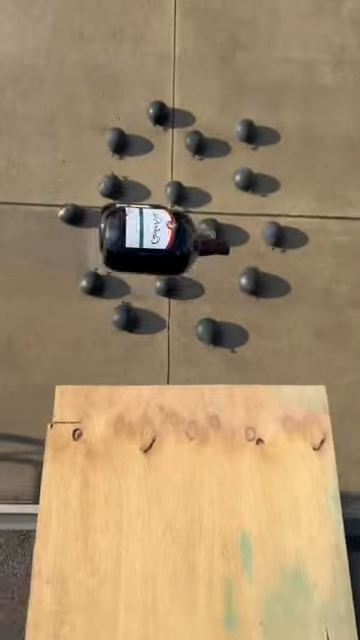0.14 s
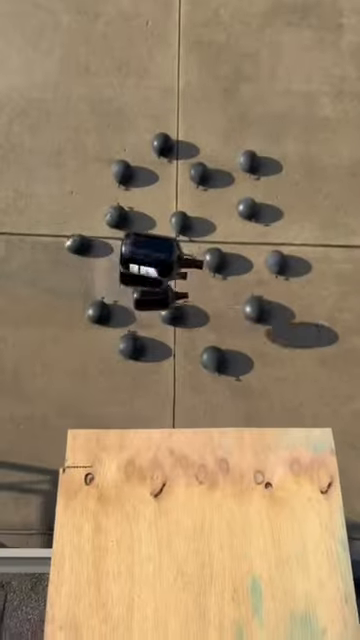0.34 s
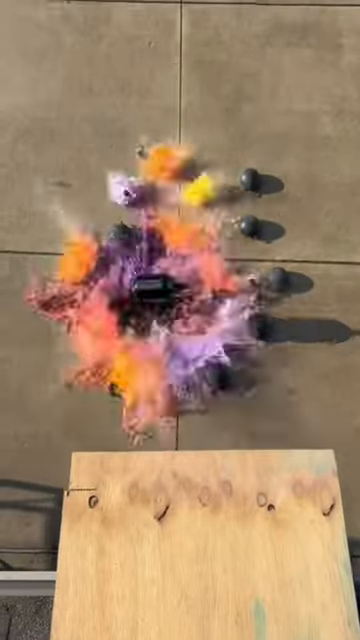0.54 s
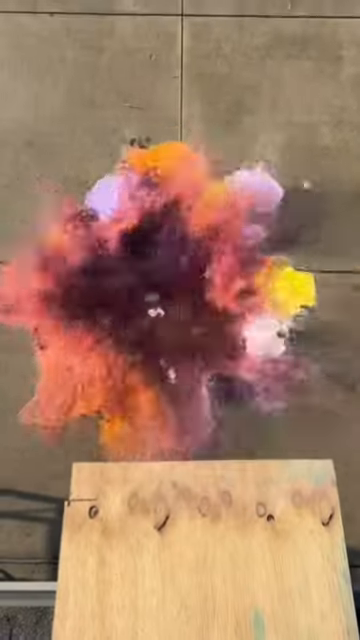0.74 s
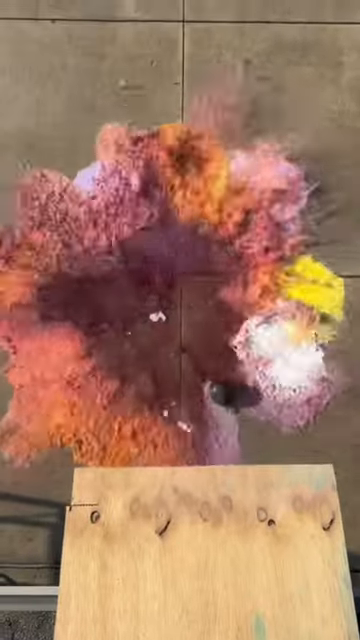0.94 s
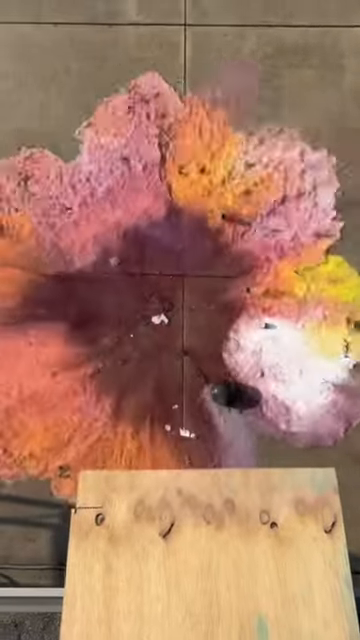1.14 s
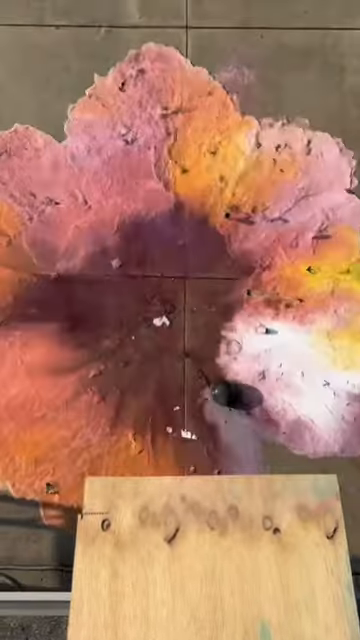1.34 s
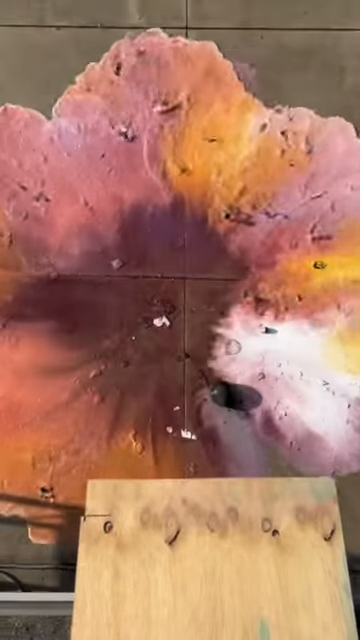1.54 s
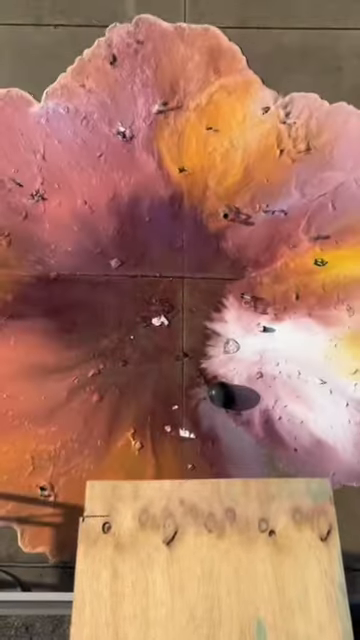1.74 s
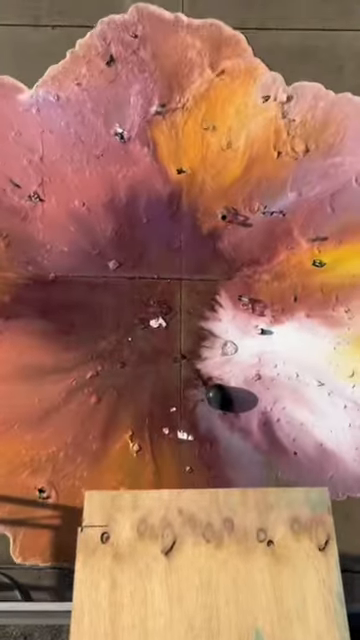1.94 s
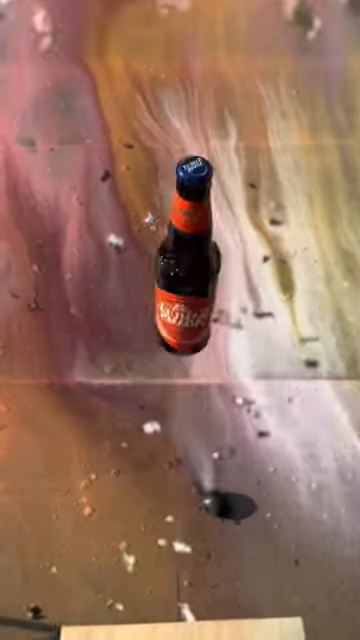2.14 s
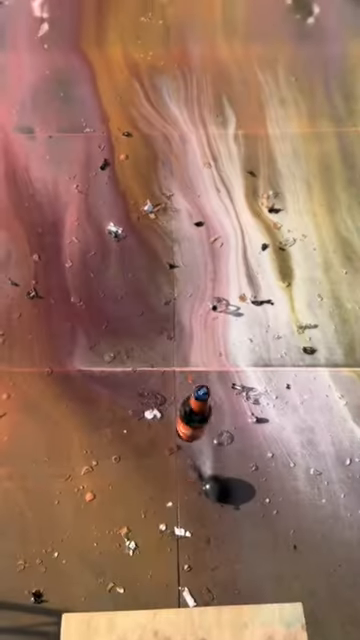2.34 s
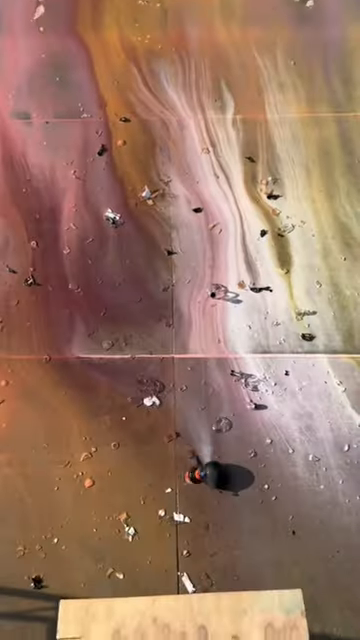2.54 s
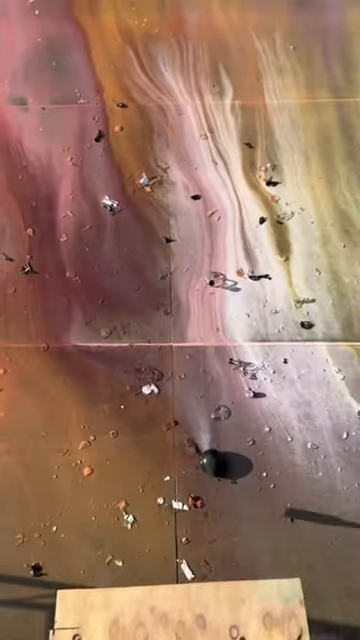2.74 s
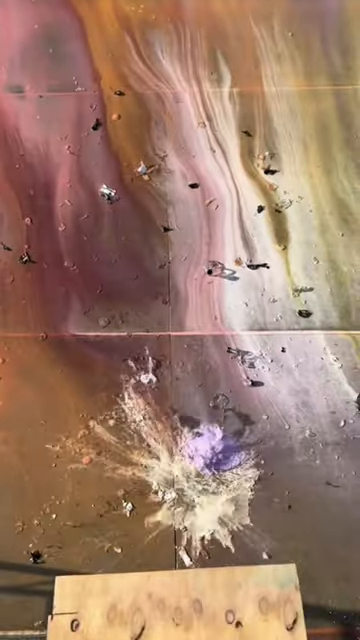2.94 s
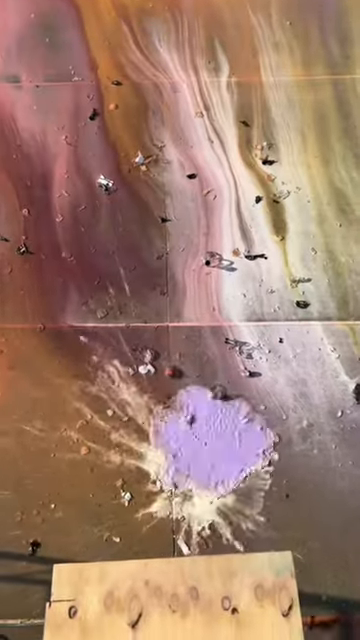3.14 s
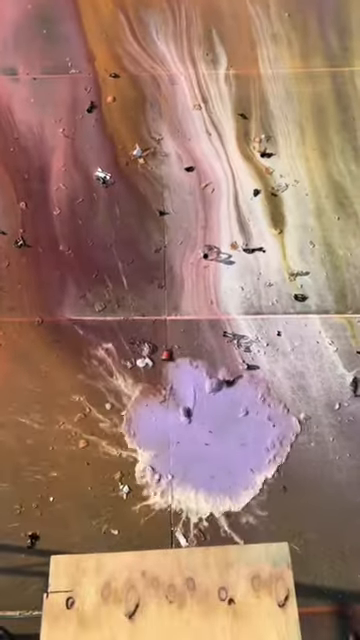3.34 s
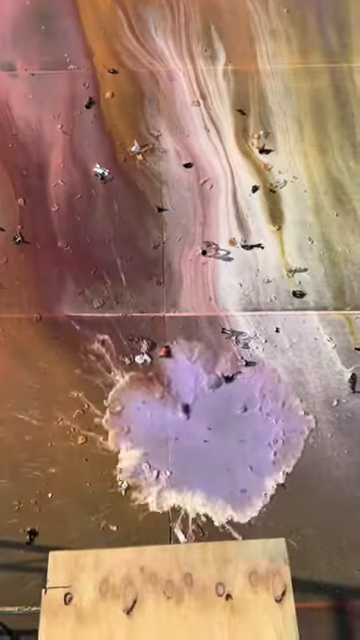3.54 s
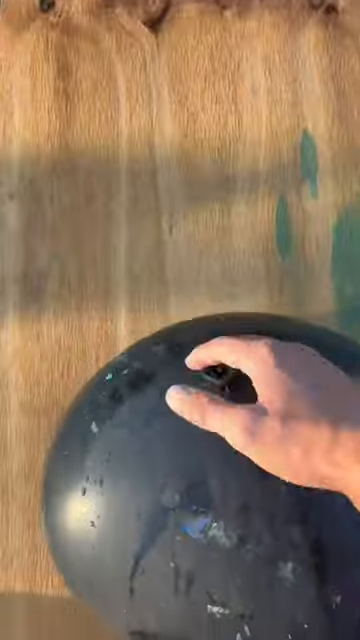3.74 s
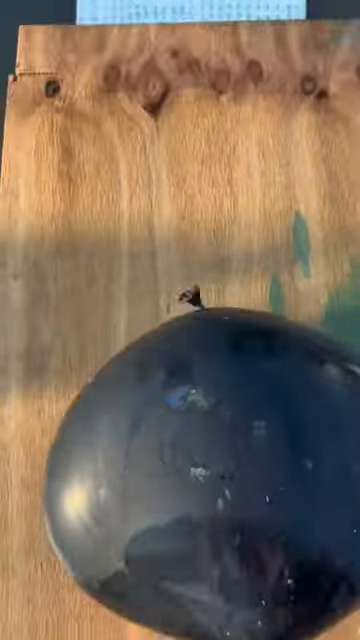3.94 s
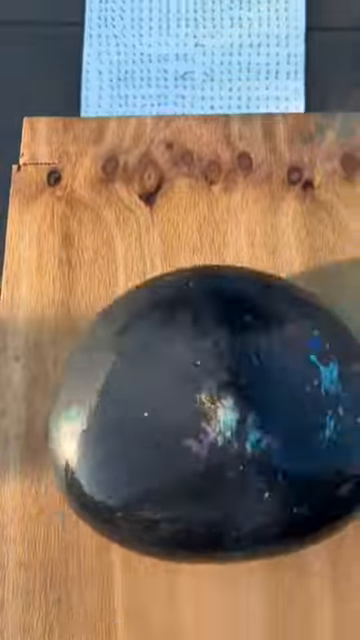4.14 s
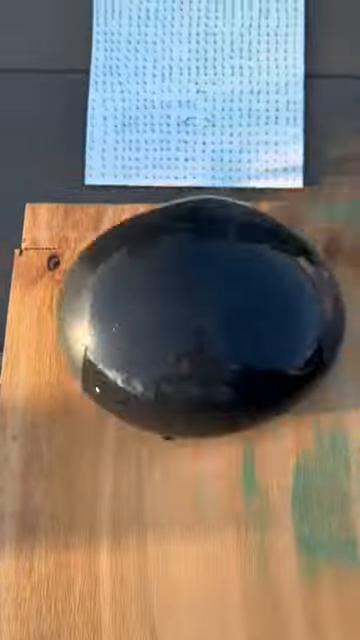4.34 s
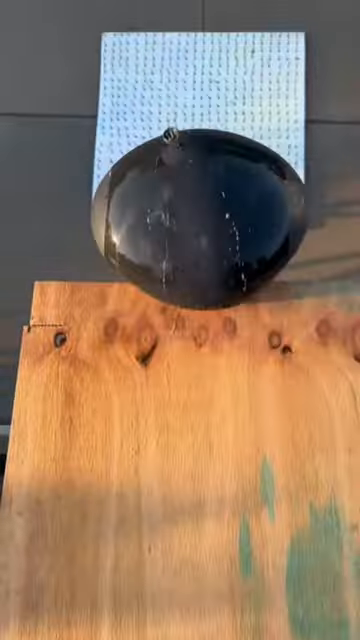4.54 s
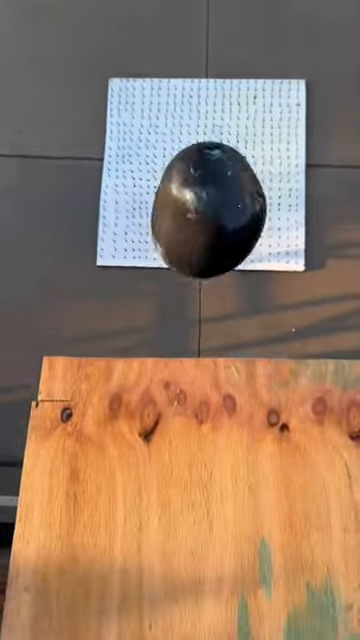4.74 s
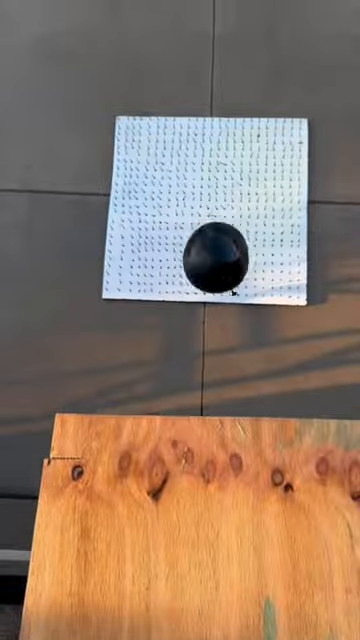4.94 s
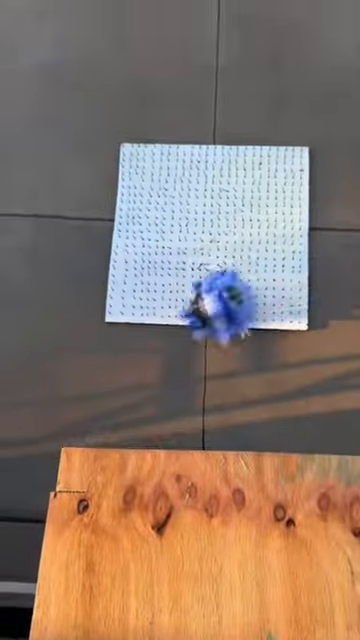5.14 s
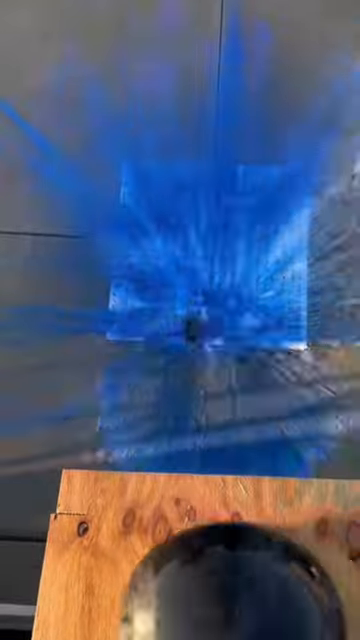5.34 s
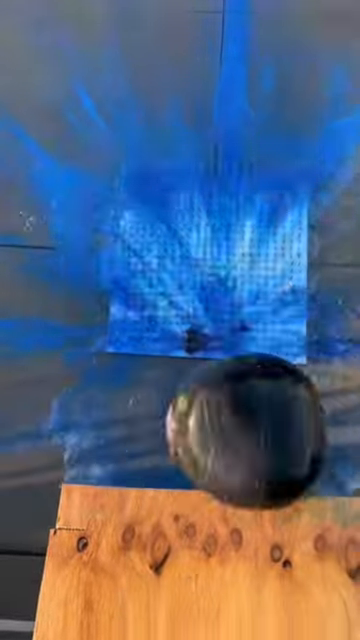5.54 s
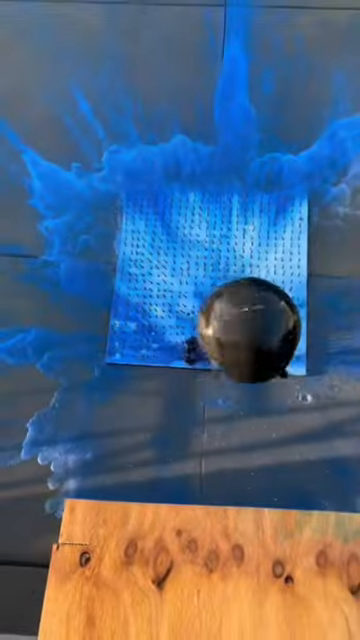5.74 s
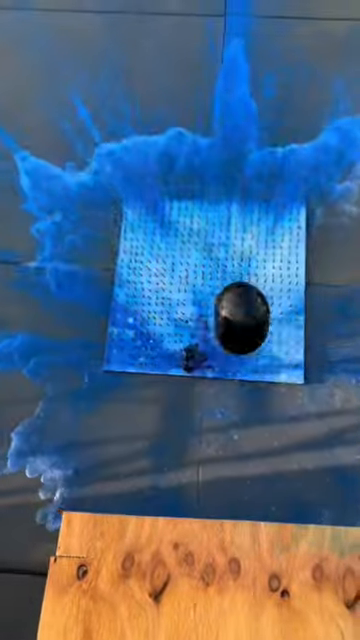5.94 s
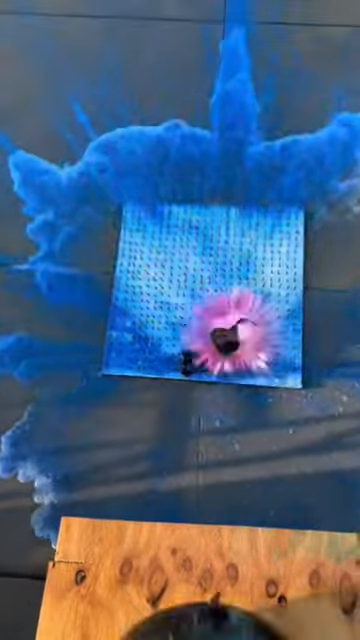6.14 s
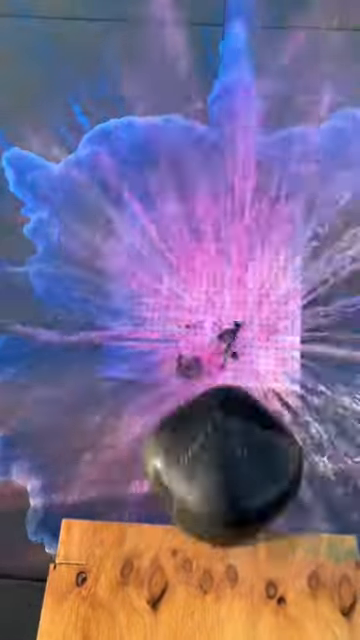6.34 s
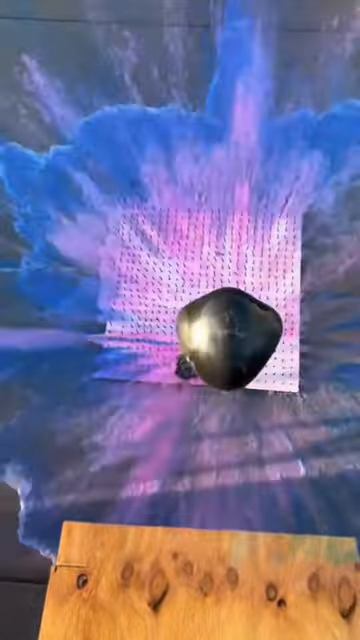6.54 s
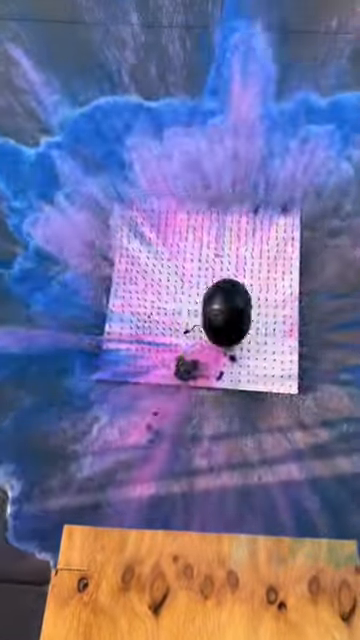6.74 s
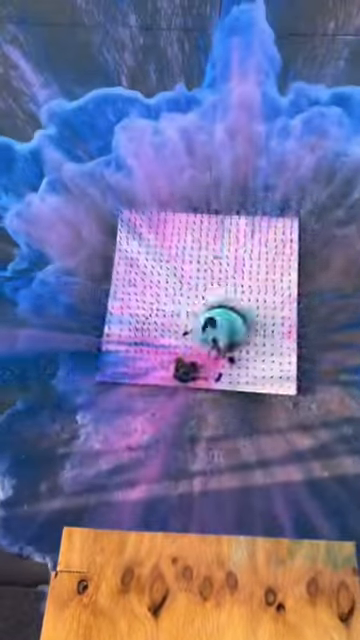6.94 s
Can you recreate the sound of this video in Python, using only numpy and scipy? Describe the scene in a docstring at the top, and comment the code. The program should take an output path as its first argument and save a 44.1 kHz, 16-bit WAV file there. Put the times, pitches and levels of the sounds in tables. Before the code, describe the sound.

Outdoors, wind buffets the microphone as two heavy glass jugs smash on concrete among paint balloons. Sharp cracks, jangling shards and wet hissing splatter thin out into crackle. A smaller bottle shatters with dull knocks, and a thick piece bounces with bright clinks. After a very brief dip, soft rubber scuffs on wood lead to three loud water-balloon bursts, each a snap, a low wet slap and fine spray.

```python
"""Concrete slab below a high wooden platform: two glass jugs smash among paint balloons, a small bottle follows
and a piece of it bounces, then three water balloons burst on a nail bed and their spray rains back.
Glass is noise bursts and dying sines; liquid is tilted hiss plus falling low waves; bursts are snapped noise.
Wind (lumpy low noise) and buffets hit the microphone over a wavering engine note and far traffic noise.
Three scenes; the sound drops briefly between the last two."""
import sys
import numpy as np
from scipy import signal
from scipy.fft import rfft, irfft
from scipy.io import wavfile
from scipy.ndimage import uniform_filter1d

SR = 44100
rng = np.random.default_rng(int(sys.argv[2]) if len(sys.argv) > 2 else 0)


def output_pcm(signal):
    """Save a mono or channel-first signal as 16-bit PCM at the path in sys.argv[1].

    Samples are clipped to [-1, 1] before scaling.
    """
    pcm = np.clip(np.atleast_2d(signal).T, -1, 1) * 32767
    wavfile.write(sys.argv[1], SR, np.round(pcm).astype(np.int16))


N = 307818

# scenes: (start [s], end [s], traffic level [dB], engine relative level [dB], fade towards the end [dB])
SCENES = [(0, 1.773, -44, -58, -7), (1.98, 3.613, -44, -47, 0.5), (3.626, 6.98, -40.5, -44.5, -1)]
FADE_S, CUT_S = 0.36, 0.0021
GAP_DB = -19  # far sounds in the gap before the third scene
# wind, one curve a spell: (time [s], relative level [dB])
WIND_SPELLS = [
    [(0, -22), (.1, -19.5), (.18, -27.5), (.21, -18), (.27, -21.5), (.31, -26.5), (.36, -22), (.39, -26.5),
     (.42, -25.5), (.7, -32.5), (.85, -36), (1.12, -34.5), (1.22, -29), (1.4, -29), (1.47, -32.5),
     (1.7, -38.5), (1.98, -46.5)],
    [(3.63, -38.5), (4.0, -41), (4.7, -47.5), (6.0, -56.5), (6.35, -50), (6.8, -51), (6.98, -38)],
]
# wind spectrum: (frequency [Hz], relative density [dB per Hz])
WIND_COLOUR = [(21, -34.5), (35, -14), (59, 8), (137, -6), (405, -21.5), (693, -48.5), (1040, -77.5),
               (1760, -120)]
# wind at the two ports: (frequency [Hz], left-right likeness [0-1])
WIND_LIKENESS = [(60, 0.99), (180, 0.86), (550, 0.62)]
# air shoved at the microphone by each water balloon, added to the wind
PUSH_RELATIVE_DB, PUSH_RISE_S, PUSH_FADE_DB_PER_S = -37.5, 0.0083, 72.5
# sudden slaps of wind: (time [s], peak [dB])
BUFFETS = [(0.079, -28), (0.2, -22), (0.263, -25)]
BUFFET_S = .0006
# spectrum of the traffic noise; a narrow dip near 6 kHz runs through the whole sound: (frequency [Hz], relative
# density [dB per Hz])
TRAFFIC_COLOUR = [(47, -36.5), (80, -11), (141, -1), (526, -19), (1000, -18), (1650, -22.5), (2400, -34.5),
                  (5240, -41), (5980, -61), (6670, -45), (15000, -56.5)]
# other noise: (frequency [Hz], left-right likeness [0-1])
LIKENESS = [(60, 1), (180, 0.99), (550, 0.71), (1650, 0.97), (4970, 0.44), (15000, 0.084)]
# glass cracking and striking the slab: (time [s], peak [dB], length [s], centre [Hz])
CRACKS = [(0.428, -25, 0.043, 3000), (0.443, 1.5, 0.0069, 3500), (0.489, -16, 0.023, 2430),
          (0.543, -0.5, 0.017, 3020), (0.647, -1.5, 0.025, 2180), (0.66, -7, 0.006, 3280),
          (0.696, -1, 0.0032, 2370), (.72, -13, 0.014, 2500), (.793, -12.5, .025, 1110),
          (0.736, -8, 0.012, 1000), (0.763, -1, 0.0044, 1350), (0.831, -8, 0.0044, 1500),
          (0.856, -11.5, 0.0043, 1800), (0.881, -7, 0.003, 2360), (1.034, -15, 0.034, 1210),
          (1.051, -14, 0.022, 2450), (1.098, -3, 0.01, 5360), (1.165, -16, 0.019, 2080),
          (2.694, -6, 0.0048, 1750), (2.721, -11, 0.0094, 2520), (2.924, -7.5, 0.0022, 2640),
          (3.005, -9.5, 0.0061, 2300), (3.044, -20, 0.0084, 5030), (3.059, -21, 0.0065, 3000),
          (3.125, -20, 0.018, 2760), (3.49, -16, 0.0038, 2710)]
# ringing shards: (time [s], relative level [dB], frequency [Hz])
SHARDS = [(0.507, -7, 4790), (.935, -17, 5020), (0.675, -2.5, 3090), (0.696, -9, 760), (0.743, -3.5, 2344),
          (0.792, -8, 2373), (0.829, -8.5, 960), (0.859, -9, 5190), (0.879, -5.5, 3090), (0.927, -14, 3340),
          (0.964, -15.5, 743), (1.002, -15, 3930), (1.05, -7, 5070), (1.073, -9, 3180), (1.099, -4.5, 2183),
          (1.121, -9.5, 1375), (1.166, -11.5, 2145), (1.188, -15, 5090), (1.21, -13.5, 3290),
          (1.263, -16.5, 3320), (1.292, -20, 1090), (3.124, -10.5, 2620), (3.131, -24.5, 3770),
          (3.579, -24, 4160), (.632, -11, 3600), (.662, -9, 3300), (.832, -10, 2540), (.857, -9.5, 2735),
          (1.595, -29, 5780)]
# thick bottle piece landing: (time [s], relative ring level [dB], tick peak [dB])
BOUNCES = [(2.7995, -33.5, -15.5), (2.8384, -39, -16.5), (2.9028, -35.5, -21), (3.055, -40.5, -20),
           (3.221, -55, -28), (3.2478, -40, -23), (3.292, -34, -33), (3.3308, -35.5, -50),
           (3.3636, -37, -48), (3.3861, -25.5, -33), (3.4197, -39, -48), (3.491, -30.5, -28),
           (3.5694, -42, -32)]
# modes of that piece: (frequency [Hz], relative level [dB], t60 [s])
PIECE_MODES = [(4860, -1.5, 0.15), (5050, 3.5, 0.18), (5070, 7.5, 0.042), (5360, -5, 0.017),
               (7000, -11, 0.056), (14300, -14, 0.045), (14900, -7, .03)]
# smashes of the jugs and of the small bottle: (first [s], second [s])
SMASH_S = (.442, 2.692)
CRUMB_COUNTS, CRUMB_THIN_S = (1800, 400), .5  # one count a smash; time constant of thinning
CRUMB_OVER_SPRAY_DB, CRUMB_LOWEST_HZ = 15, 650  # biggest crumb
TINKLES_PER_SMASH, TINKLE_OVER_SPRAY_DB, TINKLE_HZ, TINKLE_T60_S = 260, 11, (6500, 15000), .02
# liquid and crumbs thrown out: (time [s], relative level [dB], fade [dB/s], brightness [dB/octave])
SPLASHES = [(0.443, -30, 46, 0.5), (0.544, -31, 118.5, 0.5), (0.647, -29, 89, -0.5), (1.03, -32, 60, 1.5),
            (2.69, -35.5, 94.5, 0), (5.07, -24.5, 79, 0), (6.07, -26, 109, -1.05), (6.873, -21, 138, -1)]
# spectrum of the splash and burst noise; a narrow dip near 6 kHz runs through the whole sound: (frequency [Hz],
# relative density [dB per Hz])
SPLASH_COLOUR = [(110, -15), (230, 0.5), (1250, -7), (4980, -6.5), (5730, -10.5), (6040, -28.5), (6590, -9),
                 (9030, -8.5), (10400, -14), (12600, -11), (15500, -23), (16400, -85.5)]
SPLASH_RISE_S, SPLASH_DULL_S, SPLASH_DULL_DB_PER_OCTAVE = 0.021, 0.0092, -5.5
# liquid raining back: (peak time [s], relative level [dB], swell [dB/s], fade [dB/s], brightness [dB/octave])
RAINS = [(.85, -35.5, 40.5, 11, 1), (2.81, -40.5, 67, 20, 3.5), (5.378, -38, 41, 43.5, -0.5),
         (6.28, -37.5, 52, 60.5, 2.5), (6.322, -31.5, 403.5, 55.5, -2)]
TRICKLE_S, TRICKLE_RELATIVE_DB = 5.1, -59  # run-off after the first water balloon
# liquid slapping the slab: (time [s], relative level [dB], final frequency [Hz], t60 [s])
SLAPS = [(0.46, -12, 157, 0.068), (.556, -9.5, 143, 0.044), (0.656, -13, 165, 0.083),
         (5.075, -4.5, 263, 0.085), (6.071, -1, 215, 0.043), (6.876, -4.5, 243, 0.059)]
# narrow noise patches, mostly high: (time [s], peak [dB], centre [Hz])
FIZZES = [(1.274, -25, 11000), (1.444, -27, 9530), (1.505, -25, 13200), (1.574, -29, 9000),
          (1.788, -31.5, 12700), (3.433, -35, 9100), (3.602, -22, 9800), (1.325, -29, 700),
          (1.41, -28.5, 790), (1.685, -39, 530)]
# body of the small bottle on the slab: (time [s], relative level [dB])
THUMPS = [(2.696, -23.5), (2.707, -20.5), (2.73, -16.5), (2.754, -28.5), (2.785, -29)]
# modes of that body: (frequency [Hz], relative level [dB], t60 [s])
BODY_MODES = [(330, 2, 0.029), (813, -5.5, 0.039)]
# balloon dragged over plywood: (time [s], peak [dB], length [s], centre [Hz])
SCUFFS = [(3.691, -42.5, 0.032, 4260), (3.902, -43.5, 0.03, 3920), (4.261, -43, 0.15, 3260),
          (4.482, -36, 0.015, 2130), (5.932, -38, 0.16, 7000), (5.949, -28, 0.0036, 5100)]
# water balloons tearing: (time [s], peak [dB], length [s], centre [Hz])
POPS = [(5.075, -5.5, 0.018, 1910), (6.073, -2, 0.0084, 1800), (6.877, -2, 0.013, 1430)]
# wall echoes: (delay [s], level [dB])
WALLS = [(.018, -13.5)]
# yard tail: (frequency [Hz], t60 [s])
YARD_T60 = [(200, 0.11), (1000, .2), (4000, 0.13), (12000, 0.06)]
LOW_CUT_HZ, HIGH_CUT_HZ = 46, 16450


def gain_of(db):
    """Decibels to amplitude ratio."""
    return 10 ** (np.asarray(db) / 20)


def evened(x):
    """Scale to rms 1."""
    return x / np.sqrt(np.mean(x ** 2) + 1e-20)


def read(points, hz):
    """Interpolate a table over log frequency."""
    f, value = np.transpose(points)
    return np.interp(np.log(hz + 1), np.log(f + 1), value)


def add(mix, s, sound):
    """Add a sound in place at s seconds."""
    part = mix[round(s * SR):][:len(sound)]
    part += sound[:len(part)]


def played(curves, t):
    """Summed gain of level curves, silent outside their spans."""
    return sum(gain_of(np.interp(t, *np.transpose(rows)[:2], left=-200, right=-200)) for rows in curves)


def playing(t):
    """Scene index, and a gain that changes towards each scene's end and shuts in the gap before the third."""
    start, end, *_, fade_db = np.transpose(SCENES)
    k = np.searchsorted(start, t, "right") - 1
    gap = np.clip(np.maximum(end[1] - t, t - start[2]) / CUT_S, 0, 1)
    fade = np.clip(1 - (end[k] - t) / FADE_S, 0, 1)
    return k, gap * gain_of(fade_db[k] * fade)


def backdrop(column):
    """Gain of a far sound: one level per scene, shaped by the scene gain."""
    k, gate = playing(np.arange(N) / SR)
    return np.maximum(gate, gain_of(GAP_DB)) * gain_of(np.array(SCENES)[k, column])


def swelling(t, s, db, rise_s, fade_db_per_s):
    """Power of an event: quick rise, even dB fade, confined to its scene."""
    age = np.maximum(t - s, 0)
    fade = gain_of(db - fade_db_per_s * np.maximum(age - rise_s, 0))
    return (playing(t)[0] == playing(s)[0]) * (np.minimum(age / rise_s, 1) * fade) ** 2


def noise(colour, slope, pivot_hz, patchy_db, size, likeness=LIKENESS):
    """Patchy two-channel noise of overall rms 1; slope (times [s], tilts [dB/octave]) leaves frame power even."""
    hop, hz = size // 4, np.fft.rfftfreq(size, 1 / SR)
    t = np.arange(N // hop + 5) * hop / SR
    a, b, c, d, patches = rng.standard_normal((len(t), len(hz), 5)).T
    patches = uniform_filter1d(patches, size=5, axis=0)
    patches = evened(uniform_filter1d(patches, size=12, axis=1))
    octaves = np.log2(np.maximum(hz, 20) / pivot_hz)
    shape = gain_of(read(colour, hz)[:, None] + octaves[:, None] * np.interp(t, *slope))
    shape = shape / np.linalg.norm(shape, axis=0) * gain_of(patchy_db * patches)
    same = np.clip(read(likeness, hz), 0, 1)[:, None]
    left = a + 1j * b
    right = same * left + np.sqrt(1 - same ** 2) * (c + 1j * d)
    z = shape * np.array([left, right])
    return evened(signal.istft(z, nperseg=size, noverlap=size - hop)[1][:, :N])


def burst(db, length_s, centre_hz, rise_s, snap, octaves=0.86, skirt=0.32):
    """Snap plus band-weighted noise, its drive dying 30 dB over the length; db is the peak."""
    t, hz = np.arange(4096) / SR, np.fft.rfftfreq(4096, 1 / SR)
    band = np.exp(-(np.log2(hz / centre_hz + 0.0011) / octaves) ** 2)
    colour = gain_of(read(SPLASH_COLOUR, hz)) * (skirt + band)
    decay = gain_of(-30 * t / max(length_s, .001))
    drive = rng.standard_normal(len(t)) * decay * (1 - np.exp(-t / rise_s))
    drive[0] = snap
    rough = irfft(rfft(np.roll(drive, 30)) * colour)[:3000]
    rough = rough * np.minimum(np.arange(3000, 0, -1) / 1000, 1)
    return gain_of(db) * rough / abs(rough).max()


def ring(db, hz, t60_s):
    """One dying mode with a soft start."""
    t = np.arange(0, max(t60_s, .005), 1 / SR)
    return gain_of(db - 60 * t / t[-1]) * (1 - np.exp(-t / 0.0006)) * np.sin(2 * np.pi * hz * t)


def chattering(sound, length_s):
    """A loose piece chatters in uneven taps, with the energy of one landing."""
    t = np.arange(1200) / SR
    struck = rng.standard_normal(len(t)) * (rng.random(len(t)) < 500 / SR)
    taps = .5 * struck * np.exp(-t / length_s)
    taps[0] = 1
    rattle = signal.oaconvolve(sound, taps)
    return rattle * np.linalg.norm(sound) / np.linalg.norm(rattle)


def spray(t):
    """Relative gain and brightness of airborne liquid: splashes, rain and run-off add in power."""
    parts = [(gain_of(2 * TRICKLE_RELATIVE_DB) * (t > TRICKLE_S), 2.2 + 0 * t)]
    for s, db, fade_db, slope in SPLASHES:
        sheet = swelling(t, s, db, SPLASH_RISE_S, fade_db)
        onset = gain_of(-10.0) * swelling(t, s, db, 0.00078, 180)
        # starts dull, brightens as the sheet breaks up
        dull = SPLASH_DULL_DB_PER_OCTAVE * np.exp(-abs(t - s) / SPLASH_DULL_S)
        parts += [(sheet + onset, slope + dull)]
    for s, db, swell_db, fade_db, slope in RAINS:
        begun = t > max(row[0] for row in SPLASHES if row[0] < s)
        arch = db - np.where(t < s, swell_db * (s - t), fade_db * (t - s))
        same_scene = playing(t)[0] == playing(s)[0]
        parts += [(begun * same_scene * gain_of(2 * arch), slope + 0 * t)]
    power, slope = np.transpose(parts, (1, 0, 2))
    total = power.sum(0) + 1e-12
    return np.sqrt(total) * playing(t)[1], (power * slope).sum(0) / total


def wind():
    """Lumpy low pressure swings, brighter in stronger gusts; balloon bursts push air too."""
    t = np.arange(0, N / SR, .002)
    pushes = sum(swelling(t, s, PUSH_RELATIVE_DB, PUSH_RISE_S, PUSH_FADE_DB_PER_S) for s, *_ in POPS)
    db = 10 * np.log10(played(WIND_SPELLS, t) ** 2 + pushes + 1e-8)
    tilt = (t, 0.8 * (db + 18.5))
    swings = noise(WIND_COLOUR, tilt, 90, patchy_db=2.0, size=1024, likeness=WIND_LIKENESS)
    # swings of more even height
    swings = swings / (uniform_filter1d((swings ** 2).mean(0), size=1500) + 0.1) ** .36
    return gain_of(np.interp(np.arange(N) / SR, t, db) + 2.0) * swings


def drone():
    """Low engine note: a sine wavering in pitch and strength."""
    def waver():
        slow = uniform_filter1d(rng.standard_normal(N), size=1100)
        return evened(uniform_filter1d(slow, size=1100))
    pitch, swell = waver(), waver()
    tone = np.sin(2 * np.pi * np.cumsum(56 + 8 * pitch) / SR)
    return backdrop(column=3) * gain_of(5.0 + 4.4 * swell) * tone


def traffic():
    """Far wash of coloured noise."""
    return backdrop(column=2) * noise(TRAFFIC_COLOUR, ([0], [0]), 1000, patchy_db=2.5, size=1024)


def buffets():
    """A gust hits the microphone: one short suction pulse."""
    out, u = np.zeros(N), np.arange(-400, 400) / SR / BUFFET_S
    for s, db in BUFFETS:
        add(out, s - 400 / SR, -gain_of(db) * (1 - u ** 2) * np.exp(-u ** 2 / 2))
    return out


def glass():
    """Noise-burst cracks, modal shards, a bouncing piece, and crumbs that thin out after each smash."""
    out = np.zeros(N)
    for s, db, length_s, centre_hz in CRACKS:
        add(out, s, burst(db, length_s, centre_hz, rise_s=0.0014, snap=2.7))
    for s, db, hz in SHARDS:
        for ratio, share_db, t60_s in [(1, -9, 0.052), (1.09, -13.5, 0.02)]:
            add(out, s, chattering(ring(db + share_db, ratio * hz, t60_s), 0.013))
    for s, db, tick_db in BOUNCES:
        facing_db = rng.normal(0, 2, len(PIECE_MODES))  # each landing strikes another edge
        for (hz, share_db, t60_s), turn_db in zip(PIECE_MODES, facing_db):
            mode = ring(db + share_db + turn_db, hz * rng.normal(1, .009), t60_s)
            add(out, s, chattering(mode, .004))
        add(out, s, burst(tick_db, 0.011, 11000, rise_s=0.00013, snap=3.7, octaves=1.2))
    for start, count in zip(SMASH_S, CRUMB_COUNTS):
        when, pitches, smallnesses = rng.random((count, 3)).T
        times = start - CRUMB_THIN_S * np.log(1 - .93 * when)
        for s, level, pitch, small in zip(times, spray(times)[0], pitches, smallnesses):
            over_spray_db = CRUMB_OVER_SPRAY_DB - 17 * small ** .35
            # big pieces ring, small ones tick
            add(out, s, level * ring(over_spray_db, CRUMB_LOWEST_HZ * 8 ** pitch, 0.03 - 0.018 * small))
    return out


def splashes():
    """Hiss of fine drops; crackles in the first two scenes, where glass crumbs skitter in it."""
    t, coarse = np.arange(N) / SR, np.arange(0, N / SR, .001)
    level, slope = spray(coarse)
    crumbs = gain_of(4.5 * np.minimum(rng.exponential(1, N), 4)) * (rng.random(N) < 70 / SR)
    patter = signal.oaconvolve(crumbs, gain_of(-60 * t[:1500] / .03))[:N]
    patter = evened(1 + .18 * patter)
    hiss = noise(SPLASH_COLOUR, (coarse, slope), 3000, patchy_db=2.0, size=256)
    return np.interp(t, coarse, level) * gain_of(3.5) * np.where(t < SCENES[2][0], patter, 1) * hiss


def tinkles():
    """Tiny splinters skitter left and right after each smash: short high modes that follow the spray level."""
    out = np.zeros((2, N))
    for start, (_, end, *_) in zip(SMASH_S, SCENES):
        when, pitches, softnesses, sides = rng.random((TINKLES_PER_SMASH, 4)).T
        times = start + (end - 2 * TINKLE_T60_S - start) * when
        for s, level, pitch, soft, side in zip(times, spray(times)[0], pitches, softnesses, sides):
            hz = TINKLE_HZ[0] * (TINKLE_HZ[1] / TINKLE_HZ[0]) ** pitch
            mode = ring(TINKLE_OVER_SPRAY_DB - 12 * soft, hz, TINKLE_T60_S * (.3 + soft))
            chip = level * chattering(mode, .03)
            add(out[0], s, np.cos(side * np.pi / 2) * chip)
            add(out[1], s, np.sin(side * np.pi / 2) * chip)
    return out


def slaps():
    """The mass of liquid flattens: a low wave whose pitch drops, with a ragged tail."""
    out, t = np.zeros(N), np.arange(SR // 4) / SR
    for s, db, final_hz, t60_s in SLAPS:
        hz = final_hz * (1 + 1.8 * np.exp(-t / 0.003))
        wobble = evened(uniform_filter1d(rng.standard_normal(len(t)), size=120))
        ragged = 1 + .35 * np.minimum(t / .03, 1) * wobble
        turns = np.cumsum(hz * ragged) / SR
        heave = 0.49 * np.sin(2 * np.pi * 0.603 * turns)
        wave = (np.sin(2 * np.pi * turns) + heave) * (1 - np.exp(-t / 0.001))
        fading_db = db - 60 * t / max(t60_s, .01)
        add(out, s, gain_of(fading_db) * wave)
        add(out, s + 0.037, gain_of(fading_db - 16.0) * wave)  # a far wall returns it
    return out


def fizzes():
    """Brief narrow bands of noise, independent at the two ears."""
    out = np.zeros((2, N))
    for s, db, centre_hz in FIZZES:
        for ear in out:
            add(ear, s, burst(db, 0.1, centre_hz, rise_s=0.003, snap=0, octaves=0.12, skirt=0.04))
    return out


def thumps():
    """Dull modal knocks of the filled bottle as it gives way."""
    out = np.zeros(N)
    for s, db in THUMPS:
        for hz, share_db, t60_s in BODY_MODES:
            add(out, s, chattering(ring(db + share_db, hz * rng.normal(1, .04), t60_s), .008))
    return out


def scuffs():
    """Rubber on wood: soft puffs of hiss."""
    out = np.zeros(N)
    for s, db, length_s, centre_hz in SCUFFS:
        add(out, s, burst(db, length_s, centre_hz, rise_s=0.0034, snap=0))
    return out


def pops():
    """The rubber skin tears: a snap and a noise burst."""
    out = np.zeros(N)
    for s, db, length_s, centre_hz in POPS:
        add(out, s, burst(db, length_s, centre_hz, rise_s=0.000093, snap=3.44))
    return out


def yard(x):
    """Wall echo and a sparse decaying tail, different at each ear."""
    taps = np.zeros((2, SR // 2))
    at = np.arange(200, SR // 2 - 20, 20) + rng.integers(0, 20, (2, (SR // 2 - 201) // 20))
    np.put_along_axis(taps, at, rng.choice([-1., 1.], at.shape), 1)
    hz, t, z = signal.stft(taps, SR, nperseg=256)
    decay = gain_of(-60 * t / read(YARD_T60, hz)[:, None])
    tail = signal.istft(z * decay, SR, nperseg=256)[1]
    tail = gain_of(-15) * (tail + 0.54 * tail[::-1]) / np.linalg.norm(tail[0])
    for delay_s, db in WALLS:
        tail[[0, 1], round(delay_s * SR) + np.array([0, 3])] += gain_of(db)
    return signal.fftconvolve(x[None], tail, axes=1)[:, :N]


def scene():
    """Sum all layers; impacts get the yard."""
    impacts = glass() + pops() + slaps() + thumps()
    t = np.arange(N) / SR
    cut = (t < SCENES[1][1]) | (t > POPS[0][0] - .05)  # the scene change ends all ringing
    struck = cut * (impacts + yard(impacts) + fizzes())
    liquid = tinkles() + scuffs() + splashes()
    return struck + liquid + wind() + buffets() + drone() + traffic()


def record(dry):
    """Microphone: deepest bass lost, loudest peaks rounded, then the band limit."""
    thin = signal.sosfilt(signal.butter(6, LOW_CUT_HZ, "high", fs=SR, output="sos"), dry)
    rounded = thin / (1 + abs(thin / .85) ** 4) ** .25
    band_limit = signal.firwin(511, HIGH_CUT_HZ, window=("kaiser", 9), fs=SR)
    return signal.oaconvolve(rounded, band_limit[None], "same")


dry = scene()
out = record(dry)
output_pcm(out)
```